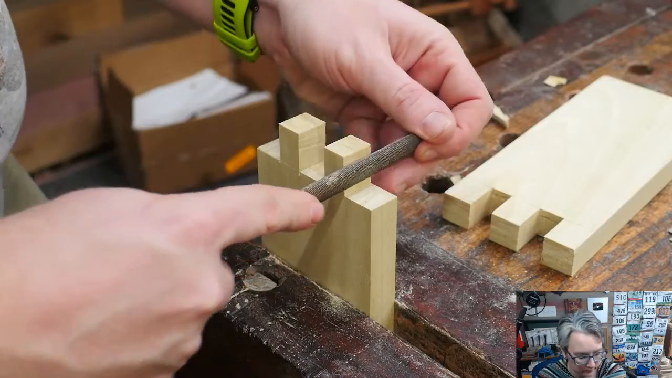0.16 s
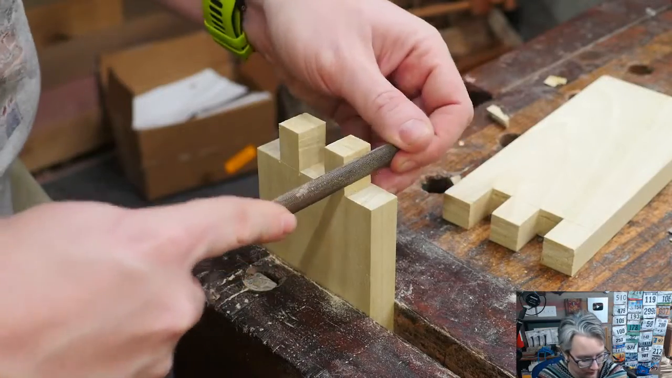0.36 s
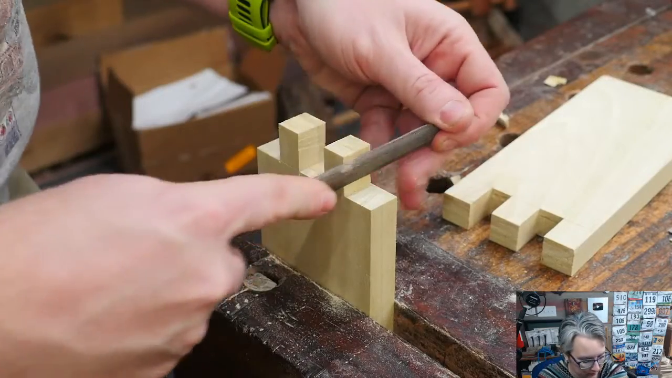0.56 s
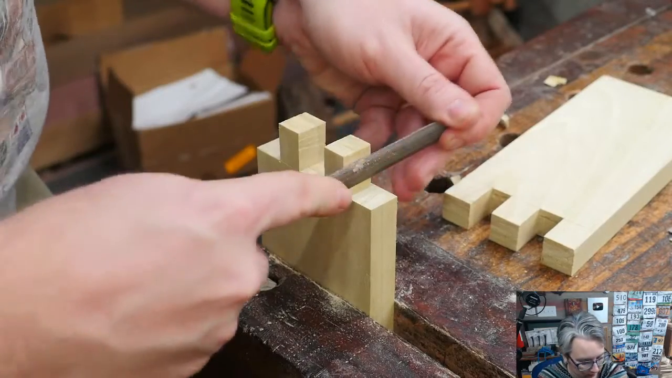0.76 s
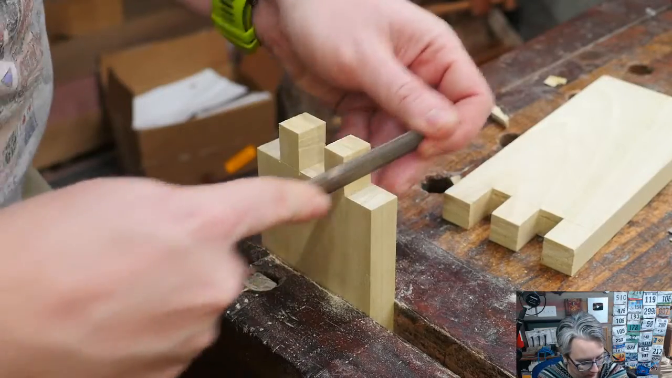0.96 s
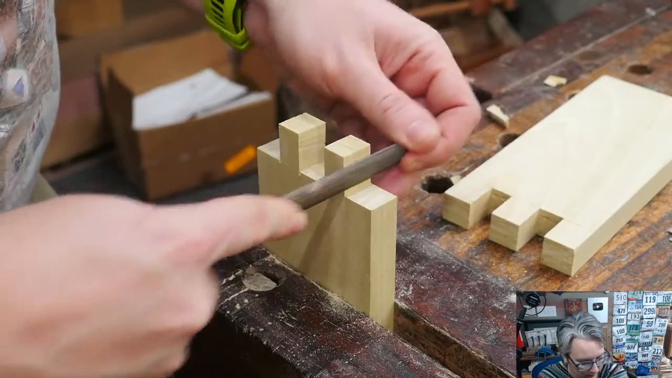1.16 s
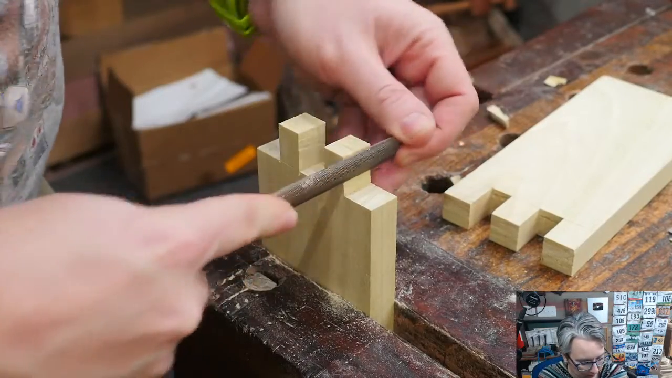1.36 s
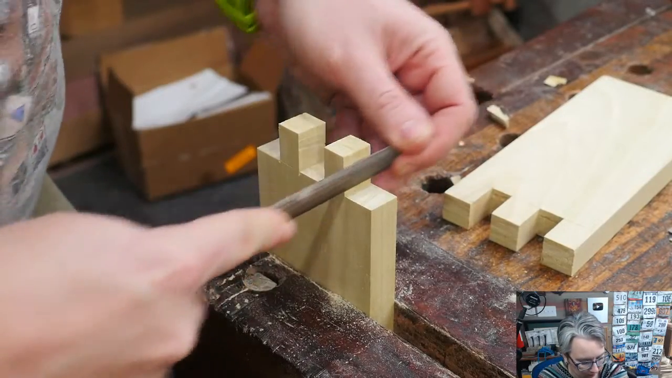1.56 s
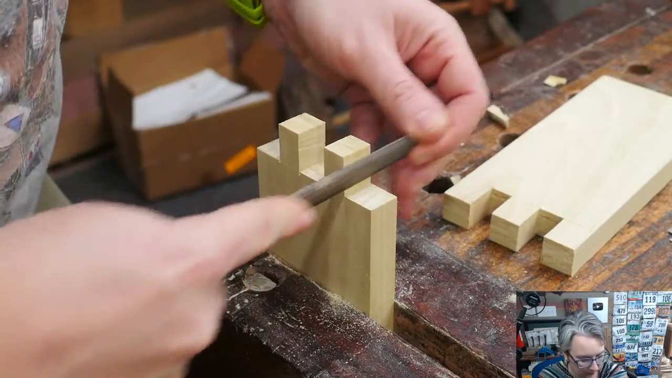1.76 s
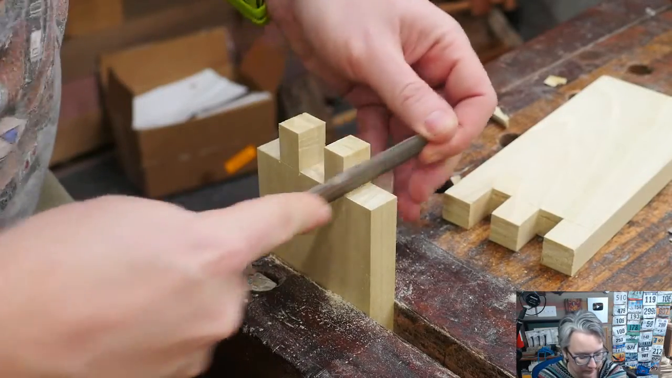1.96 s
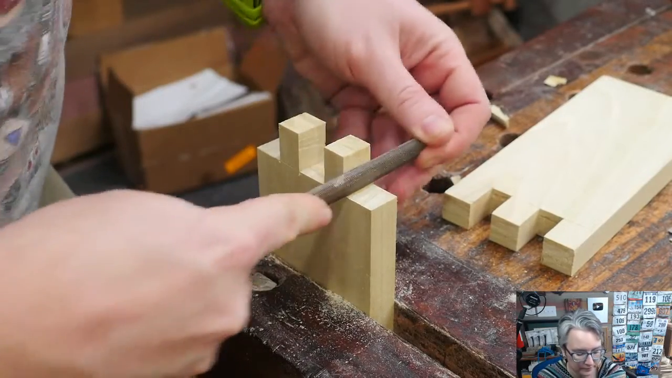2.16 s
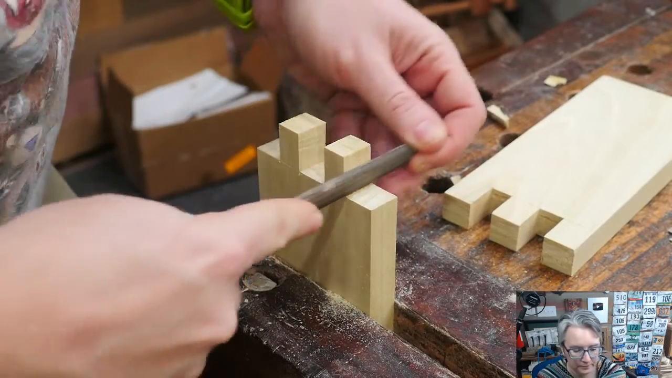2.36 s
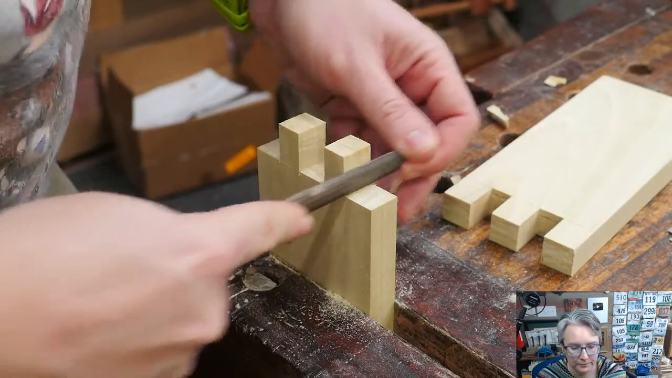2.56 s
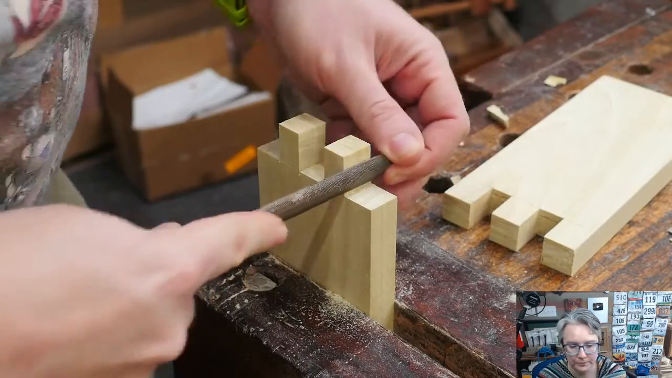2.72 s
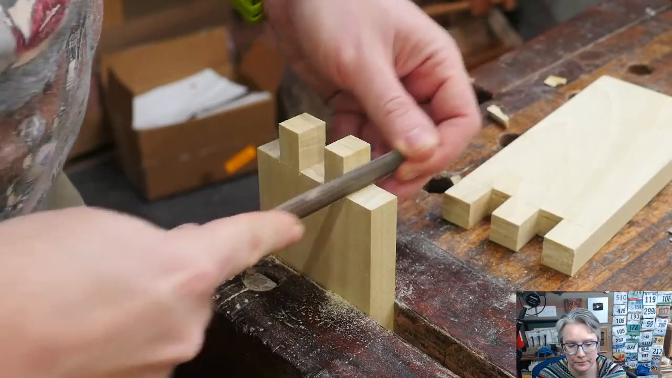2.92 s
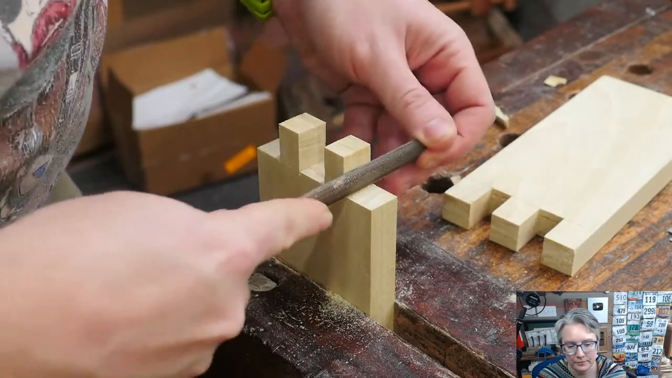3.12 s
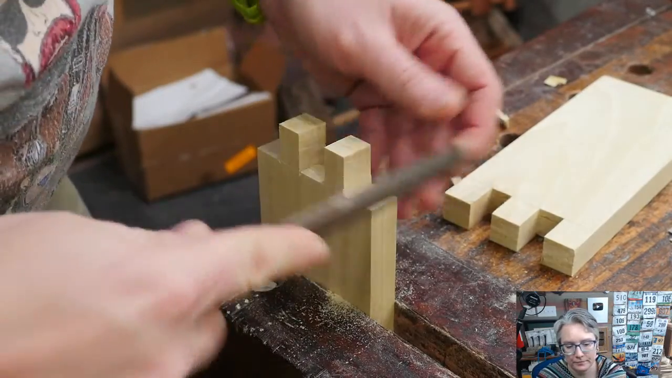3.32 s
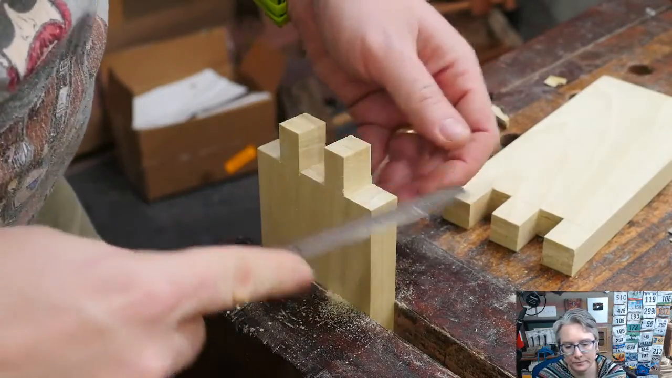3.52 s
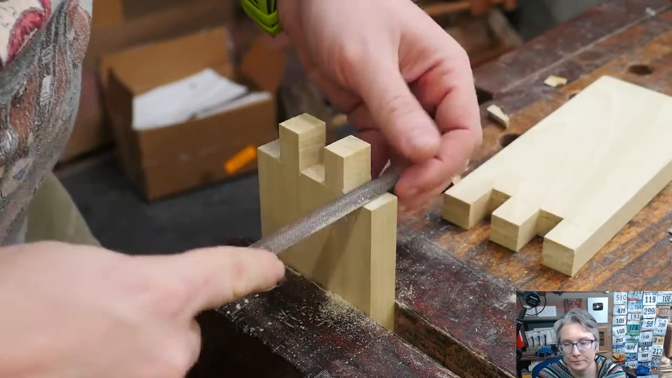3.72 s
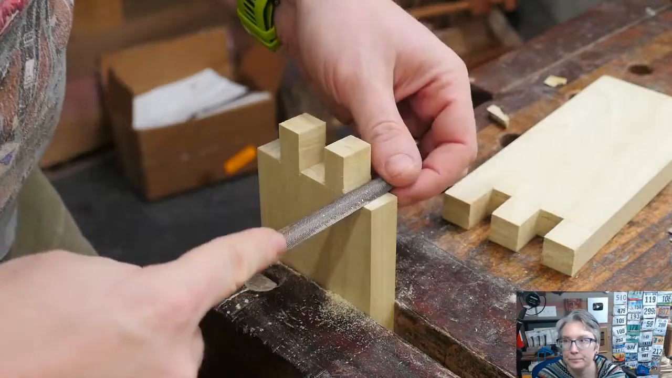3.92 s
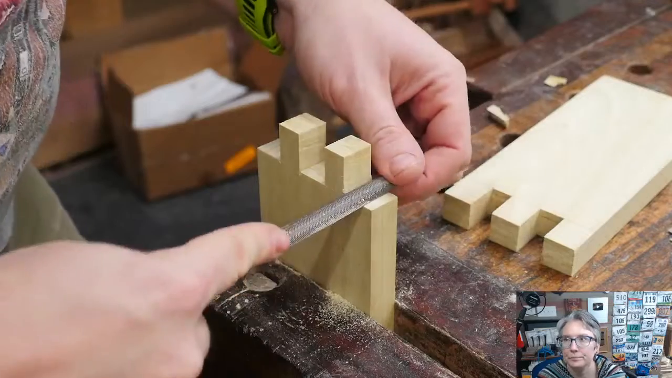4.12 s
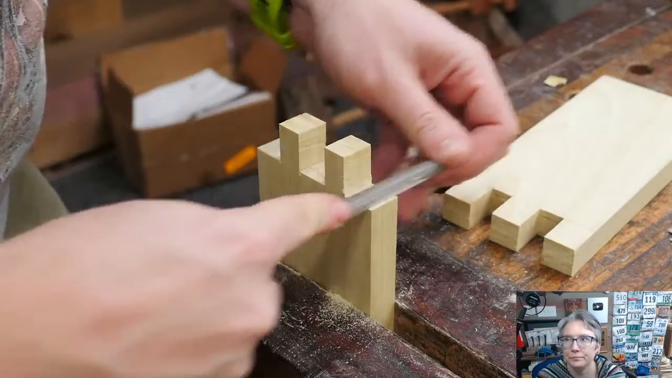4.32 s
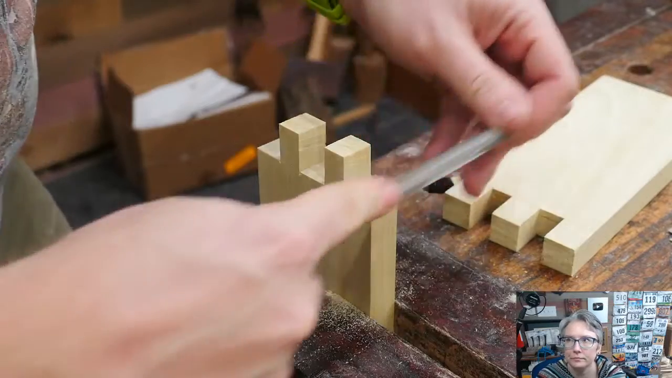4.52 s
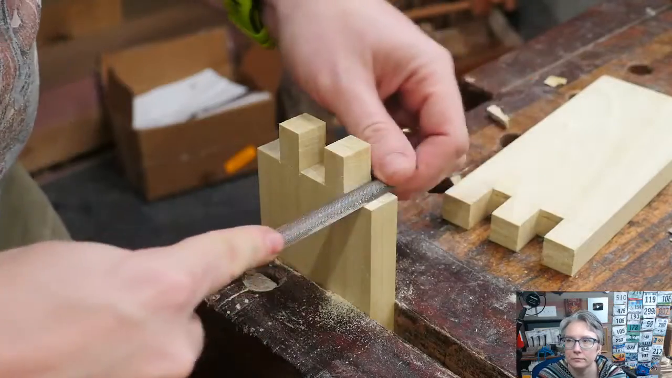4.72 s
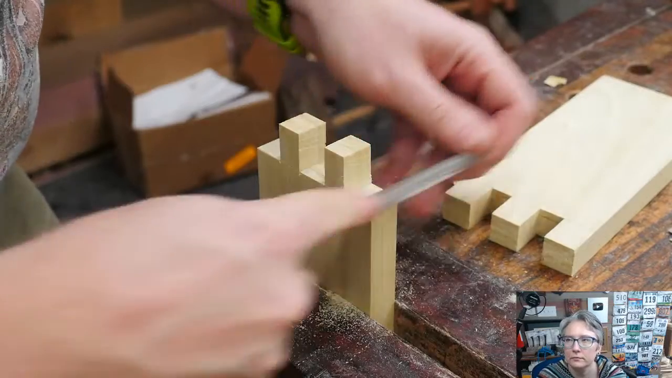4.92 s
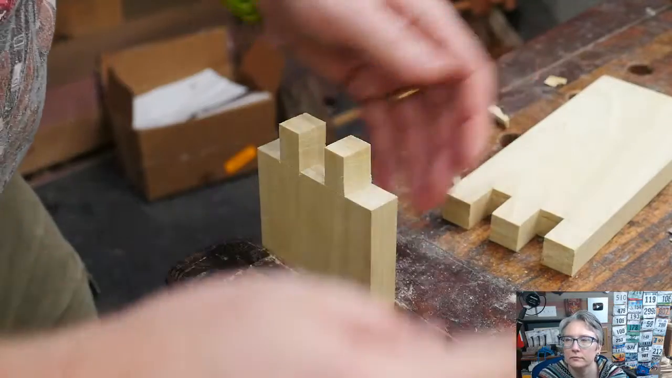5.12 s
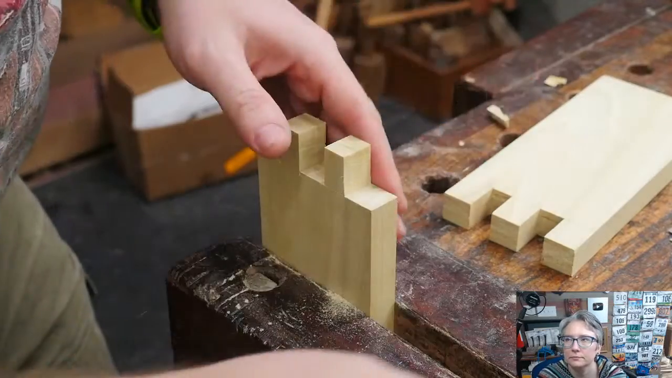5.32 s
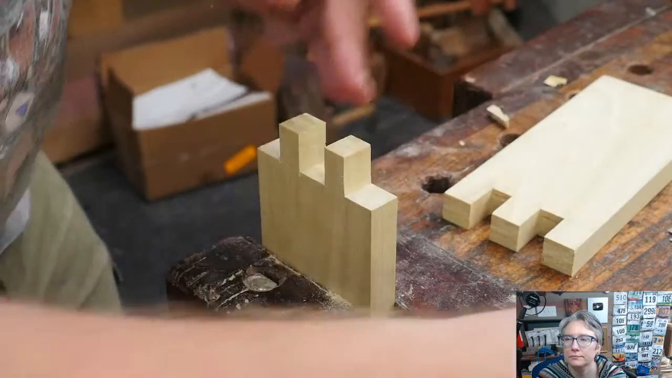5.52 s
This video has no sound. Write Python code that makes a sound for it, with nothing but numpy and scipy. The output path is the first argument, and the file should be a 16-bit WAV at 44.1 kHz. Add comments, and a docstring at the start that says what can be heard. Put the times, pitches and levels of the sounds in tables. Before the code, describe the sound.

In a small, quiet workshop, a steel hand file rasps rapidly to and fro on a wooden joint held in a vice, about four strokes each way per second, easing off after three seconds. Steel knocks on the wood, then one longer and one shorter separate stroke follow. Cloth rustles and the file clacks onto the bench. Close mono microphone, short room tail, faint hum.

```python
"""Rapid to-and-fro rasping comes first: a hand file on the shoulder of a wooden joint in a bench vice, in a small
workshop with a faint mains hum. Then come two separate finishing strokes, one long and one short, and knocks of steel.
Teeth catch on the grain and ring the board, torn fibres hiss, and light contact squeaks in short glides.
At the end the arm draws back with a rustle of cloth and the file is laid on the bench.
One mono microphone hears it all; the handwork shares one place and one room tail, whatever its source."""
import sys
import numpy as np
from scipy import signal
from scipy.fft import rfft, irfft
from scipy.io import wavfile

SR = 44100
rng = np.random.default_rng(int(sys.argv[2]) if len(sys.argv) > 2 else 0)


def unload_audio(sound):
    """Save the sound as a 16-bit wav file, at the path given as the first command line argument."""
    columns = np.transpose(np.atleast_2d(sound))
    # keep every value between -1 and 1, then stretch to whole-number steps
    steps = np.round(np.clip(columns, -1, 1) * 32767)
    wavfile.write(sys.argv[1], SR, steps.astype(np.int16))


N = 250488
TIME = np.arange(N) / SR

# forward strokes: start t/s, end t/s, effort above a middling stroke level/dB, steel resonance on the edge f/Hz
PUSH_STROKES = [(-0.1, 0.062, -10, 4900), (0.298, 0.428, 3, 4840), (0.598, 0.715, 1, 2950),
                (0.846, 0.964, 4, 2920), (1.081, 1.191, 2, 4500), (1.307, 1.418, 1.5, 3300),
                (1.537, 1.647, 2.5, 3010), (1.762, 1.869, 1, 3440), (1.986, 2.091, -1, 3560),
                (2.211, 2.325, -4, 3460), (2.434, 2.57, -2.5, 4540), (2.669, 2.795, -5, 5460),
                (2.919, 3.053, -5.5, 3040)]
# return strokes: start t/s, end t/s, effort above a middling stroke level/dB, steel resonance on the edge f/Hz
PULL_STROKES = [(0.123, 0.263, -5.5, 4920), (0.475, 0.578, -2.5, 5170), (0.726, 0.84, 2, 3860),
                (0.965, 1.074, 2.5, 5580), (1.196, 1.3, 5, 4850), (1.42, 1.53, 3.5, 3240),
                (1.649, 1.757, 3.5, 3200), (1.872, 1.977, 3.5, 3100), (2.103, 2.205, 1.5, 4830),
                (2.328, 2.433, 0.6, 3340), (2.564, 2.665, 0, 3630), (2.795, 2.898, -2.5, 3370),
                (3.094, 3.179, -15.5, 2740)]
# two separate finishing strokes, one long and one short:
# start t/s, end t/s, effort above a middling stroke level/dB, steel resonance on the edge f/Hz
FINISHING_STROKES = [(4.102, 4.348, -1.64, 3370), (4.735, 4.857, -0.6, 3450)]
# colour of the tearing fibres on forward strokes: f/Hz, relative level/dB
PUSH_FIBRES = [(800, 8), (1500, -1), (2300, -1.5), (3200, 2), (4000, -3.5), (5200, -6.5), (6400, -12),
               (7550, -10), (8200, -17), (8850, -15), (9350, -19.5), (10900, -20.5), (12500, -35.4),
               (15500, -48)]
# colour of the tearing fibres on return strokes: f/Hz, relative level/dB
PULL_FIBRES = [(800, -17.8), (1600, 4), (2400, -5), (3200, -1.5), (4400, -7.5), (5100, -9.5), (6300, -12),
               (7150, -3.5), (8200, -20.5), (8850, -10), (9350, -17.5), (11200, -20.5), (12500, -31),
               (15500, -41.5)]
# colour of the tearing fibres on finishing strokes: f/Hz, relative level/dB
FINISHING_FIBRES = [(1300, -12), (1780, 9.5), (2100, -6.5), (2800, -5), (3500, -11), (3950, -23),
                    (5200, -16), (6400, -21), (8400, -23), (9100, -10), (10000, -20), (14000, -25),
                    (15500, -36)]

# Three ways of stroking, each with these settings:
# crest: share of the stroke before top speed; board_db: the board's full level/dB;
# rasp_db, sizzle_db: levels of a middling stroke, level/dB;
# skate_db: effort level/dB above which the file skates and the board gets no louder;
# tooth_hz: tooth rate at top speed and middling effort, before the first grip adds to it, f/Hz;
# relax_db: fall of the hand's pressure over the stroke, level/dB (negative: it rises);
# bite, scuff: first grip on board and on fibres, shares of top speed;
# contact_db: the edge's steel resonance against the fibres, level/dB
PUSH_MANNER = dict(crest=.47, board_db=-25, rasp_db=-42, sizzle_db=-50.5, skate_db=5.5, tooth_hz=1548.5, relax_db=-1.5, bite=.6, scuff=0.31, contact_db=-12)
PULL_MANNER = dict(crest=.46, board_db=-34, rasp_db=-46.5, sizzle_db=-55, skate_db=-3, tooth_hz=2208, relax_db=10.5, bite=.35, scuff=0.31, contact_db=-17.5)
FINISHING_MANNER = dict(crest=.69, board_db=-25.5, rasp_db=-42.5, sizzle_db=-56.5, skate_db=2, tooth_hz=1683, relax_db=18, bite=.17, scuff=0.3, contact_db=-6)
# the rasp follows the effort; the board grows more slowly, the sizzle faster
BOARD_DB_PER_DB, SIZZLE_DB_PER_DB = 0.6244, 1.43
TOOTH_RISE_PER_DB = 0.1  # natural log of the tooth rate: more effort drives the teeth past faster

# modes of the clamped board, before load and extra damping: f/Hz, width f/Hz, relative level/dB
BOARD_MODES = [(111, 300, -39.5), (220.5, 27, -26), (357.5, 58, -23.5), (422.6, 26.8, -23),
               (548, 46, -21.5), (619.4, 19, -12.5), (696, 7.2, -10.5), (755, 11.5, -11), (840, 17.7, -8.5),
               (865.4, 21, -10), (965.3, 64, 1), (1056, 132.6, -5), (1149, 56.5, -4.5),
               (1173.5, 48.6, -5.5), (1297, 76, -16.5), (1453.5, 22.8, -11.5), (1600, 62, -19.5),
               (1792, 27, -15), (1962, 124, -32.5)]
# modes of the steel file, damped by both hands: f/Hz, width f/Hz, relative level/dB
FILE_MODES = [(2640, 53, -33), (2970, 52, 6.5), (4435, 56, -2), (4410, 57, -3.5), (5070, 45, -11.5),
              (6870, 70, -6.5), (7640, 110, -13), (9050, 230, -12.5)]
# bending modes that sing on when the file's tip is held loosely: f/Hz, width f/Hz, relative level/dB
LOOSE_TIP_MODES = [(353, 43, -0.5), (611, 43, -3), (1430, 40, -7.5), (2780, 36, -7), (5110, 40, -8.5)]
# how freely the file can ring: t/s, drive level/dB
TIP_LOOSENESS = [(.2, 11.5), (.4, 0), (.55, 14.5), (.8, -13.5), (3.2, -7), (4.15, -5), (4.85, -2)]
# modes of the bench top with the file on it, before extra damping: f/Hz, width f/Hz, relative level/dB
BENCH_MODES = [(560, 60, -8.5), (750, 28, -9), (825, 25, -7.5), (950, 23, 2), (1260, 33, -9),
               (1400, 52, -12), (1930, 83, -9.5), (2147, 59, -9), (2610, 120, -13), (3270, 43, -10),
               (3970, 140, -25), (4400, 310, -16), (6030, 160, -17), (8060, 300, -23.5), (11460, 400, -24)]

# splinters snap as the file turns round: t/s, peak level/dB
SPLINTER_SNAPS = [(0.257, -46), (.718, -37), (2.55, -49), (2.559, -39), (2.664, -40)]
# dull bumps of hand and arm: t/s, peak level/dB
HAND_BUMPS = [(2.667, -34.5), (2.741, -29), (5.211, -28)]
# the file touches the joint: t/s, thud reference level/dB, crack peak level/dB
JOINT_KNOCKS = [(3.6155, -21.5, -41), (3.6256, -24.5, -25.5), (4.1016, -45, -62), (4.585, -45, -65),
                (4.653, -21, -37)]
# the file lands on the bench: t/s, reference level/dB
BENCH_LANDINGS = [(5.6278, -22.5)]
# the file skims and squeaks faintly: start t/s, end t/s, first f/Hz, last f/Hz, centre level/dB
SQUEAK_GLIDES = [(3.213, 3.245, 2720, 2600, -57.5), (3.21, 3.24, 6200, 3400, -63),
                 (4.89, 4.938, 7400, 11000, -72), (4.935, 5.045, 5000, 5110, -70)]

# the arm draws back over the apron: start t/s, end t/s, cloth level/dB, hiss level/dB, both at top speed
CLOTH_RUBS = [(4.865, 5.107, -48, -65.5), (5.094, 5.3, -39, -52.5), (5.262, 5.444, -60, -57)]
# colour of the cloth: f/Hz, relative level/dB
CLOTH_SPECTRUM = [(29, -27), (50, 5), (123, -1), (248, -7), (394, 1.5), (809, -0.5), (1070, -3.5),
                  (1210, 3), (2860, -18), (3220, -10.5), (3640, -31), (6000, -28), (7800, -55),
                  (13200, -120)]
RUB_CREST, RUB_SHARPNESS = 0.44, 1.58  # share of a rub before top speed; power of speed its loudness follows

# colour of the workshop's still air: f/Hz, relative level/dB
AIR_SPECTRUM = [(25, 13.5), (45, 3.5), (90, -2.5), (200, -6), (350, -9), (550, -12), (1000, -15.5),
                (2700, -20.5), (15000, -24.5)]
# mains hum: f/Hz, rms level/dB
MAINS_HUM = [(60, -57.5), (180, -73)]
AIR_DB, TOP_HZ = -63, 15600  # air rms from 200 Hz to the top of the band; the recorder's upper limit


def undb(db):
    """Decibels to gain."""
    return 10 ** (np.asarray(db) / 20)


def rms(x):
    """Root mean square, kept above zero."""
    return np.sqrt(np.mean(x ** 2)) + 1e-12


def add(out, s, x):
    """Mix x into out from time s on; any part before time zero is left off."""
    i = int(round(s * SR))
    x, i = x[max(-i, 0):], max(i, 0)
    out[i:i + len(x)] += x[:len(out) - i]


def band(x, lo_hz, hi_hz, order=3):
    """Band-pass."""
    edges = [lo_hz, min(hi_hz, SR / 2 - 1)]
    return signal.sosfilt(signal.butter(order, edges, "band", fs=SR, output="sos"), x)


def colour(x, points):
    """Shape x by (Hz, dB) points; it falls away beyond both ends."""
    hz, db = np.transpose(points)
    f = np.maximum(np.arange(len(x) + 1) * SR / (2 * len(x)), 1)
    ends = (1 + (f / hz.max() / 2) ** 8) * (1 + (hz.min() / f) ** 8)
    gain = undb(np.interp(np.log(f), np.log(hz), db)) / np.sqrt(ends)
    return irfft(rfft(x, 2 * len(x)) * gain)[:len(x)]


def ring(x, modes, damping=1):
    """Drive damped modes with x; neighbours in the list swing in opposite senses."""
    t = TIME[:SR // 6]
    response = np.zeros(len(t))
    for k, (hz, width, db) in enumerate(modes):
        decay = np.exp(-np.pi * width * damping * t)  # a wider mode dies sooner
        response += (-1) ** k * undb(db) * width * decay * np.cos(2 * np.pi * hz * t)
    return signal.fftconvolve(x, response)[:len(x)]


def walk(size, rate):
    """Random wander of spread near 1, in straight lines between values drawn rate times a second."""
    return np.interp(np.arange(size) * rate / SR, np.arange(size), rng.standard_normal(size))


def grains(per_s, spread_db):
    """Sparse clicks at a moving rate, a few much larger than the rest."""
    size = len(per_s)
    hits = rng.random(size) < per_s / SR
    signs = rng.choice([-1, 1], size)
    return hits * signs * undb(spread_db * np.minimum(rng.exponential(size=size), 4))


def shop():
    """Coloured noise for still air, and steady sine partials for a faint mains hum."""
    air = colour(rng.standard_normal(N), AIR_SPECTRUM)
    hum = np.zeros(N)
    for hz, db in MAINS_HUM:
        hum += undb(db) * np.sqrt(2) * np.sin(2 * np.pi * (hz * TIME + rng.random()))
    return air * undb(AIR_DB) / rms(band(air, 200, 23000)) + hum


def room(x, wet_db, low_t60, high_t60, treble_db):
    """The bench and cluttered walls return a short tail whose treble dies first."""
    t = TIME[:SR // 2]
    low = band(rng.standard_normal(len(t)), 100, 3500, order=2) * undb(-60 * t / low_t60)
    high = band(rng.standard_normal(len(t)), 890, 10000, order=1) * undb(treble_db - 60 * t / high_t60)
    onset = np.clip((t - .003) / .006, 0, 1)  # no returns for 3 ms, full after 9 ms
    tail = (low + high) * onset / np.sqrt(np.sum(undb(-120 * t / low_t60)))
    return x + undb(wet_db) * signal.fftconvolve(x, tail)[:N]


def swing(progress, crest):
    """Speed of a hand movement, 0 to 1 and back, fastest at the share crest of its length."""
    warp = np.log(.5) / np.log(np.clip(crest, .2, .8))
    return np.maximum(np.sin(np.pi * np.clip(progress, 0, 1) ** warp), 0)


def teeth(speed, top_hz, jitter=.22, scatter_db=1.5):
    """One uneven pulse for each tooth that crosses the edge; the rate follows the speed."""
    travel = np.cumsum(top_hz * speed * np.exp(jitter * walk(len(speed), 900))) / SR
    crossings = np.diff(np.floor(travel), prepend=0)
    return crossings * undb(scatter_db * rng.standard_normal(len(speed)))


def steel_echo(x, progress, near_s=0.00116, far_s=0.001678, strength=0.25):
    """Bending waves return from the file's tip; the moving contact's delay sweeps fine stripes through the hiss."""
    n = np.arange(len(x))
    lag = (near_s + (far_s - near_s) * (1 - np.cos(np.pi * progress)) / 2) * SR
    return x + strength * np.interp(n - lag, n, x, left=0)


def stroke(length, effort_db, contact_hz, fibre_colour, crest, board_db, rasp_db, sizzle_db, skate_db,
           tooth_hz, relax_db, bite, scuff, contact_db):
    """The file speeds up and stops again: teeth ring the board, and the tearing fibres brighten with speed."""
    size = int(length * SR)
    progress = np.minimum(np.arange(size + SR // 10) / size, 1)  # 0.1 s is left for the ring to die
    speed = swing(progress, crest)
    fresh = (1 - progress) ** 3  # the teeth grip at once, before the file is up to speed
    dig = bite * fresh
    pressure = undb(-relax_db * progress)

    # the file sticks and slips about 88 times a second
    judder_hz = 88 * np.exp(0.304 * walk(len(speed), 71.8))
    judder = np.cos(2 * np.pi * np.cumsum(judder_hz) / SR)
    grip = undb(4.5 * walk(len(speed), 165.7) + 1.6 * walk(len(speed), 44.4) + 3.4 * judder)
    catches = teeth(speed + dig, tooth_hz * np.exp(TOOTH_RISE_PER_DB * effort_db)) * grip
    tearing = grains(9000 * (speed + dig), 2.58) * grip ** 0.16
    catches, tearing = catches / rms(catches), tearing / rms(tearing)

    load = 1 + 0.016 * rng.standard_normal()  # each stroke loads the board a little differently
    loaded_modes = [(hz * load, width, db) for hz, width, db in BOARD_MODES]
    board = ring((catches + 1.42 * tearing) * (speed ** .5 + dig) * pressure, loaded_modes)

    scrape = steel_echo((tearing + 0.32 * catches) * (speed ** 1.3 + scuff * fresh), progress)
    fibres = colour(scrape, fibre_colour)
    steel = ring(scrape, FILE_MODES)
    contact = ring(scrape, [(contact_hz, 130, 0)])
    hiss = fibres / rms(fibres) + undb(-8.5) * steel / rms(steel) + undb(contact_db) * contact / rms(contact)
    sizzle = colour(hiss * (speed + dig) ** 0.52, [(5400, -14.0), (6500, -4.3), (16000, 3.5)])
    rasp = colour(hiss, [(1200, 4.0), (5800, 4.5), (7200, -23)])
    rasp_core = band(rasp, 2200, 6300)  # the rasp's level is set by this band

    board_level = undb(board_db + BOARD_DB_PER_DB * min(effort_db - skate_db, 0))
    rasp_level = undb(rasp_db + effort_db)
    sizzle_level = undb(sizzle_db + SIZZLE_DB_PER_DB * effort_db)
    return (board * board_level / rms(board[:size])
            + rasp * rasp_level / rms(rasp_core[:size])
            + sizzle * sizzle_level / rms(sizzle[:size]))


def filing(strokes, fibre_colour, manner):
    """All strokes of one kind, each with its own effort and steel resonance."""
    out = np.zeros(N)
    for start, end, effort_db, contact_hz in strokes:
        add(out, start, stroke(end - start, effort_db, contact_hz, fibre_colour, **manner))
    return out


def loose_tip(strokes):
    """The strokes drive the file's bending modes, the more so the more loosely its tip is held."""
    drive = strokes * undb(np.interp(TIME, *np.transpose(TIP_LOOSENESS)))
    return 2 * np.pi / SR * sum(ring(drive, [mode]) for mode in LOOSE_TIP_MODES)


def crack(decay_s, lo_hz, hi_hz):
    """A brief burst of contact noise with peak 1."""
    t = TIME[:SR // 10]
    x = band(rng.standard_normal(len(t)) * np.exp(-t / decay_s), lo_hz, hi_hz, order=2)
    return x / np.abs(x).max()


def blow(modes, damping, top_hz):
    """The ring of one blow, with peak 1; softer contact lowers its top."""
    x = band(ring(signal.unit_impulse(SR // 5), modes, damping), 190, top_hz, order=2)
    return x / np.abs(x).max()


def contacts():
    """Splinters snap, the hand bumps, steel knocks on the joint and damps it, and the file lands on the bench."""
    out = np.zeros(N)
    for s, db in SPLINTER_SNAPS:
        add(out, s, undb(db) * crack(.0012, 5200, 17600))
    for s, db in HAND_BUMPS:
        add(out, s, undb(db) * crack(0.0044, 52, 770))
    for s, thud_db, crack_db in JOINT_KNOCKS:
        add(out, s, undb(thud_db - 2.5) * blow(BOARD_MODES, damping=3.5, top_hz=1910))
        add(out, s, undb(thud_db - 4.5) * crack(0.003, 1075, 1380))
        add(out, s, undb(thud_db - 14) * crack(0.037, 290, 840))  # the vice and bench answer lower and longer
        add(out, s, undb(crack_db) * crack(0.0015, 1870, 4500))
    for s, db in BENCH_LANDINGS:
        add(out, s, undb(db - 3) * blow(BENCH_MODES, damping=0.66, top_hz=13000))
        add(out, s, undb(db - 7.0) * crack(0.0019, 3920, 4560))  # the steel's own short click
        add(out, s, undb(db - 16) * crack(0.039, 320, 3000))
    return out


def squeaks():
    """Light contact sings in short, unsteady glides that flutter in level."""
    out = np.zeros(N)
    for start, end, first_hz, last_hz, db in SQUEAK_GLIDES:
        size = int((end - start) * SR)
        hz = np.linspace(first_hz, last_hz, size) * (1 + 0.037 * walk(size, 1520))
        flutter = undb(db + 4.8 * walk(size, 320))
        tone = np.sqrt(2) * np.sin(2 * np.pi * np.cumsum(hz) / SR)
        add(out, start, flutter * signal.windows.tukey(size, .5) * tone)
    return out


def arm():
    """Cloth rubs on cloth: dense soft catches under a fine hiss, swelling with the speed of each movement."""
    cloth = colour(grains(np.full(N, 4000.), 2.4) * undb(1.4 * walk(N, 70)), CLOTH_SPECTRUM)
    hiss = band(rng.standard_normal(N), 2500, 11500, order=1)
    cloth, hiss = cloth / rms(cloth), hiss / rms(hiss)
    out = np.zeros(N)
    for start, end, cloth_db, hiss_db in CLOTH_RUBS:
        swell = swing((TIME - start) / (end - start), RUB_CREST) ** RUB_SHARPNESS
        out += swell * (undb(cloth_db) * cloth + undb(hiss_db) * hiss)
    return out


def scene():
    """All the handwork sounds in the one room, over its air and hum, as one channel."""
    pushes = filing(PUSH_STROKES, PUSH_FIBRES, PUSH_MANNER)
    pulls = filing(PULL_STROKES, PULL_FIBRES, PULL_MANNER)
    finishing = filing(FINISHING_STROKES, FINISHING_FIBRES, FINISHING_MANNER)
    strokes = pushes + pulls + finishing
    work = strokes + loose_tip(strokes) + squeaks() + contacts() + arm()
    in_room = room(work, wet_db=-9.0, low_t60=0.32, high_t60=0.21, treble_db=2.0)  # t60 in seconds
    return (in_room + shop())[None]


def record(dry):
    """The recorder cuts the top with a steep low-pass."""
    return signal.sosfilt(signal.ellip(10, .1, 80, TOP_HZ, fs=SR, output="sos"), dry)


dry = scene()
out = record(dry)
unload_audio(out)
```